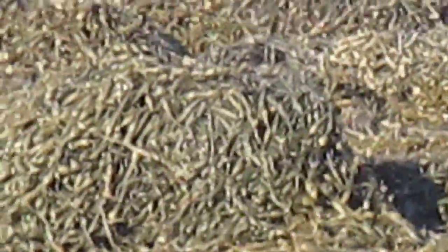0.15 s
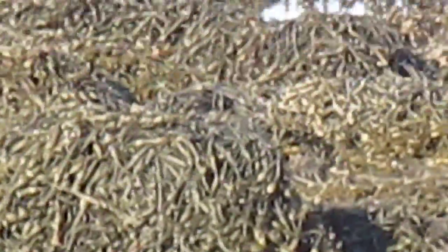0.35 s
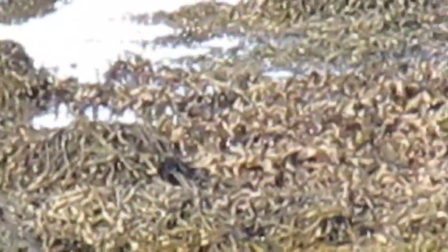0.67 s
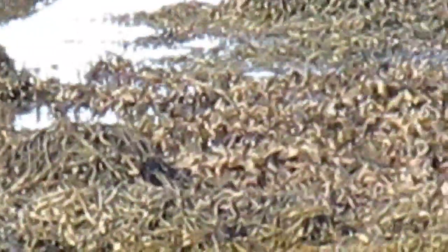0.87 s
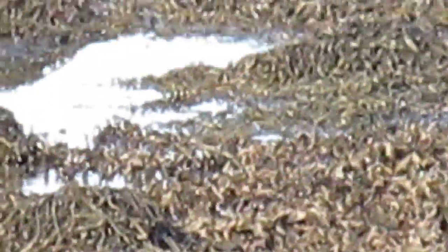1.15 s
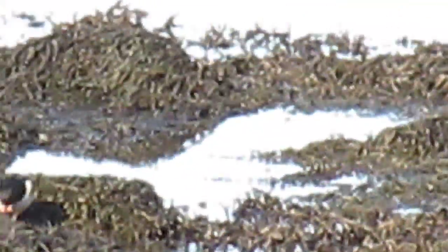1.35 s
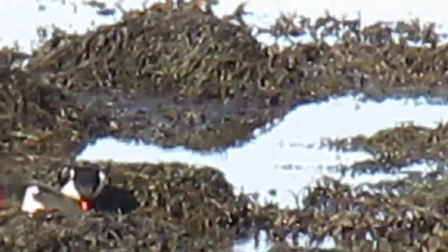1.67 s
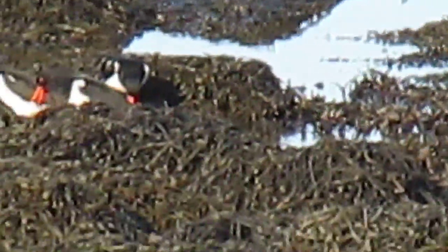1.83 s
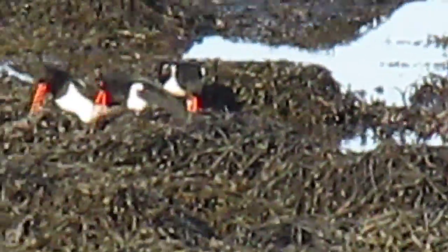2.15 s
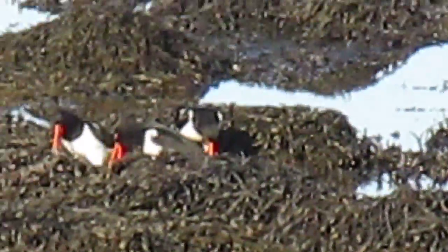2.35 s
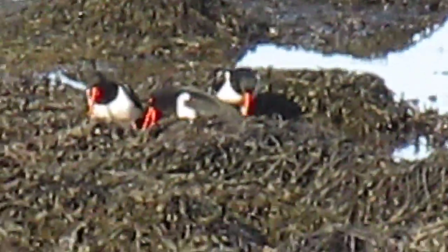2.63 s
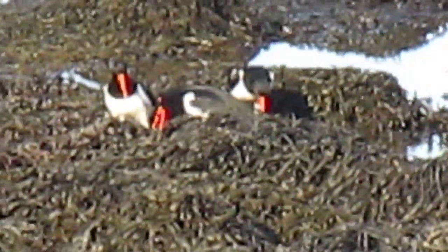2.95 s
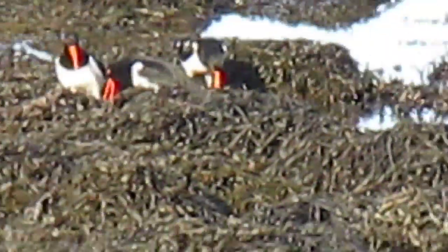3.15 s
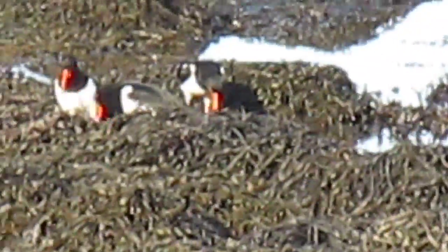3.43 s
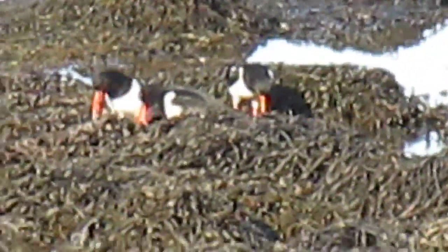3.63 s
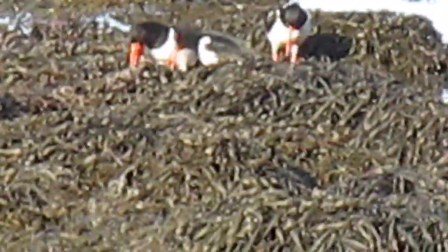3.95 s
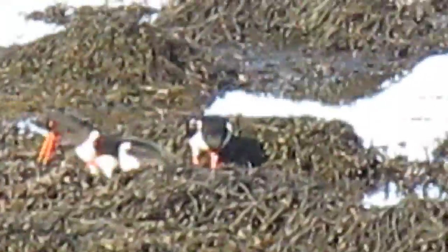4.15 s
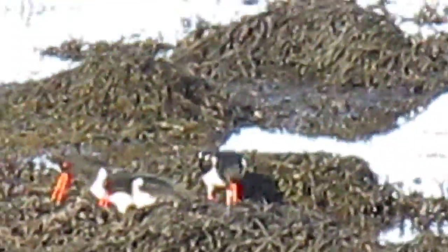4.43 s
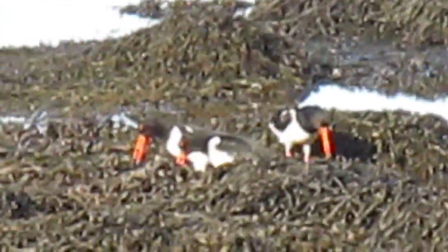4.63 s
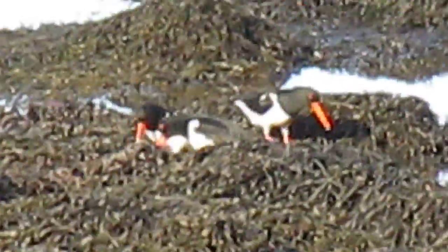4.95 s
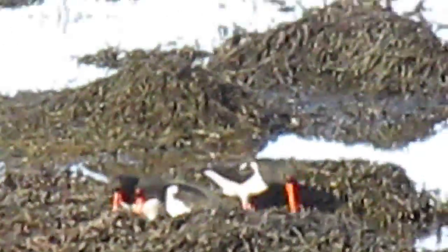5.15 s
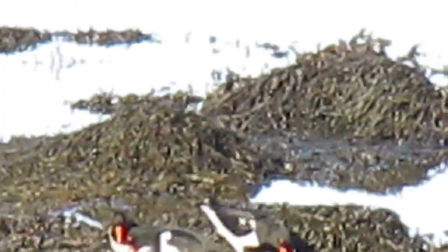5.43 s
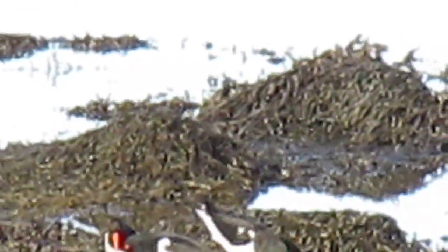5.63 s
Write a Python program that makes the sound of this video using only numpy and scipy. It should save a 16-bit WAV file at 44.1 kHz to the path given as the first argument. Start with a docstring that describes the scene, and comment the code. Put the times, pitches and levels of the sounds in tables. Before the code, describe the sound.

Shrill, piercing wader calls overlap continuously at a moderate distance, with short dull echoes from rocks. A bright lead bird peeps over raspy pips and a fast run of lower yelping notes, gradually dropping in pitch. Close to the microphone, soft irregular wind rumble swells, especially after four and a half seconds; light plastic ticks and a brief finger brush come near the end.

```python
"""Oystercatchers piping on a low-tide shore

Three oystercatchers pipe together over weed-covered rocks: arched pips, low reedy notes and slurs.
Each call is a gliding stack of harmonics, scattered off the rocks by decaying noise echoes.
Wind on a hand-held camera is gusting low noise; its case clicks as pushes ringing damped sines.
A finger brush is a short hiss, over faint low throbs and a steady bed of air and microphone hiss."""
import sys
import numpy as np
from scipy import signal
from scipy.fft import rfft, irfft, next_fast_len
from scipy.io import wavfile
from scipy.ndimage import uniform_filter1d

SR = 44100
rng = np.random.default_rng(int(sys.argv[2]) if len(sys.argv) > 2 else 0)


def materialize(psi):
    """Save the field psi as 16-bit PCM at rate SR to the path in sys.argv[1].

    A 1-D psi becomes a single channel; in a 2-D psi each row is a channel.
    """
    bounded = np.clip(np.atleast_2d(psi).T, -1, 1)
    quanta = np.round(bounded * 32767).astype(np.int16)
    wavfile.write(sys.argv[1], SR, quanta)


N = 255339
TIME = np.arange(N) / SR   # seconds

# Wind on the ports. Each row: time in seconds, gust level in dB before trims and chance drift.
GUSTS = [(0.0, -42.5), (0.16, -61), (0.5, -39), (0.63, -49.5), (1.24, -66), (1.43, -37.5), (1.71, -46.5),
         (1.76, -31.5), (2.16, -52.5), (2.26, -38.5), (2.32, -56), (4.0, -39), (4.08, -31), (4.14, -41),
         (4.34, -37), (4.37, -51.5), (4.51, -26), (4.84, -28), (5.03, -54.5), (5.14, -36), (5.6, -36),
         (5.63, -25.5), (5.79, -37.5)]
# Colour of the low wind rumble. Each row: frequency in Hz, relative level in dB.
RUMBLE_COLOUR = [(18, -1.5), (35, 10), (65, 10.5), (100, 2.5), (130, -8.5), (220, -52), (1500, -110)]
# Colour of the higher wind flutter. Each row: frequency in Hz, relative level in dB.
FLUTTER_COLOUR = [(70, -12.5), (115, 2), (160, -6.5), (240, -16.5), (350, -29.5), (550, -52), (3000, -110)]
# Single eddies that slap the ports. Each row: time in seconds, level in dB before the slap trim.
BUFFETS = [(0.486, -41), (1.79, -47.5), (2.25, -53.5), (3.669, -34), (4.061, -36.5), (4.638, -27.5),
           (4.866, -31), (5.298, -36), (5.43, -32.5), (5.661, -36.5)]
# Colour of still shore air and microphone hiss. Each row: frequency in Hz, relative level in dB.
AIR_COLOUR = [(30, -5.5), (200, 14), (450, 0.5), (650, -2), (1200, -1), (2500, 1.5), (4500, -9),
              (6300, -11.5), (9500, -9.5), (12000, -14), (15500, -17.5)]
AIR_DB = -55.5
# Overall colour of the calls as heard, throat, ground and microphone together, as partials
# glide through it. Each row: frequency in Hz, strength in dB.
CALL_COLOUR = [(1300, -1.5), (2100, -1), (2600, 6.5), (3300, 2.5), (4300, -5), (5100, -8), (5600, -13),
               (6400, -3.5), (6750, -11.5), (7500, -3.5), (7900, -13), (9800, -9.5), (12000, -16.5),
               (15000, -42)]
# Drawn-out slurs. Each row: a contour of (time in seconds, pitch in Hz) points,
# then overtone level in dB before the trim.
SLURS = [([(0, 2090), (.015, 2240), (.04, 2050), (.065, 1396)], -62.5), ([(.255, 1463), (.27, 2204),
         (.32, 2010), (.385, 1572)], -60.5), ([(.435, 1500), (.448, 2250), (.458, 1990), (.469, 2270),
         (.482, 1930)], -62), ([(.488, 1430), (.503, 1997), (.56, 1906), (.6, 1440)], -58.5)]
# Touches on the camera case. Each row: time in seconds, strength of the push in dB.
CLICKS = [(.04, -41.5), (.305, -42), (.685, -38), (.84, -40.5), (1.163, -37), (1.217, -38.5), (1.32, -37),
          (1.908, -34), (4.051, -37.5), (4.206, -28.5), (4.356, -27.5), (4.409, -24.5), (5.388, -34),
          (5.425, -29.5), (5.435, -30.5), (5.565, -35.5)]
# A push of the reference strength has this corner frequency; weaker pushes sit lower.
CLICK_REFERENCE_DB, CLICK_REFERENCE_HZ = -27.5, 4900
# Ringing modes of the case. Each row: frequency in Hz, level in dB, 60 dB decay time in seconds.
CASE_MODES = [(740, -39, 0.0055), (1020, -6, 0.038), (1350, 15.5, 0.0028), (2080, 1.5, 0.008),
              (2710, 3, 0.021), (3150, -1, 0.028), (3510, 0.5, 0.02), (3900, 5, 0.0063),
              (5830, 0.5, 0.0091), (6830, 1, 0.0095)]
# The lead bird's full peeps. Each row: crest time in seconds, nominal length in seconds,
# crest pitch in Hz, fundamental level in dB before the trim.
PEEPS = [(0.104, .097, 3250, -41.5), (0.387, 0.075, 3170, -43.5), (0.664, 0.073, 3184, -41.5),
         (.936, 0.055, 3085, -40), (1.013, 0.044, 3224, -36), (1.263, 0.046, 3287, -40.5),
         (1.434, 0.038, 2980, -45.5), (1.527, .047, 3170, -40), (1.778, 0.048, 3107, -37.5),
         (1.988, 0.043, 3095, -35), (2.192, 0.046, 3037, -39), (2.406, 0.047, 3057, -37),
         (2.643, 0.04, 2866, -37.5), (2.883, 0.05, 2923, -41.5), (3.118, 0.055, 2973, -39),
         (3.381, .045, 2713, -37), (3.65, 0.046, 2740, -38), (3.955, 0.043, 2570, -37.5),
         (4.248, 0.05, 2470, -47.5), (4.525, 0.045, 2390, -49), (5.011, 0.042, 2700, -42.5),
         (5.432, 0.052, 2407, -41.5), (5.7, 0.045, 2684, -44.5)]
# Short pips, most leading into a peep. Each row: crest time in seconds, crest pitch in Hz,
# fundamental level in dB before the trim.
KIPS = [(.223, 2888, -43), (0.487, 2870, -43.5), (.762, 3050, -43.5), (1.214, 2825, -45.5),
        (1.701, 2924, -38), (1.935, 2785, -36), (2.106, 2720, -45), (2.139, 2740, -36), (2.37, 2840, -38),
        (2.586, 2753, -38), (2.826, 2677, -40), (3.077, 2840, -48.5), (3.326, 2730, -38.5),
        (3.599, 2755, -38.5), (3.889, 2700, -38.5), (4.161, 2655, -43), (4.435, 2460, -45.5),
        (4.968, 2584, -43.5), (5.257, 2894, -43.5), (5.459, 2730, -42), (5.662, 2680, -50)]
KIP_S = .037   # nominal length
# The lead bird's overtones. Each row: time in seconds, overtone level in dB before the trim.
LEAD_OVERTONES = [(.6, -60.5), (1.05, -49), (1.9, -57.5), (2.6, -58), (2.9, -51.5), (3.1, -55), (4.0, -55),
                  (4.5, -62), (5.15, -52), (5.5, -64.5)]
# Peeps and pips share one arch: climb and bend as shares of the nominal length.
RISE_SHARE, BEND_SHARE = .44, .84
# A second bird's flat, harsh pips. Each row: crest time in seconds, crest pitch in Hz,
# overtone level in dB before the trim.
RASPS = [(0.123, 2515, -64.5), (0.326, 2550, -60.5), (.607, 2530, -57.5), (.785, 2626, -54.5),
         (0.973, 2573, -54.5), (1.129, 2537, -53), (1.301, 2570, -55), (1.451, 2580, -54),
         (1.628, 2525, -55.5), (1.779, 2440, -58.5), (2.687, 2450, -56.5), (2.85, 2487, -53.5),
         (3.054, 2394, -52.5), (3.248, 2440, -52.5), (3.434, 2415, -54.5), (3.61, 2380, -56.5),
         (4.69, 2330, -60.5), (4.776, 2270, -65), (5.203, 2287, -65.5), (5.236, 2490, -58.5),
         (5.642, 2380, -63.5)]
# A run of reedy arches, about seven a second. Each row: crest time in seconds, length in seconds,
# crest pitch in Hz.
YELPS = [(0.727, 0.033, 2520), (0.927, 0.034, 2430), (1.098, 0.031, 2360), (1.244, .028, 2360),
         (1.419, 0.039, 2410), (1.586, 0.038, 2330), (2.077, 0.046, 2294), (2.234, 0.042, 2237),
         (2.385, 0.054, 2240), (2.531, 0.053, 2320), (2.668, .042, 2146), (2.772, 0.03, 1836),
         (2.961, 0.025, 1810), (3.144, 0.034, 1880), (3.23, 0.041, 1996), (3.347, 0.038, 1993),
         (3.467, 0.033, 2050), (3.592, 0.046, 2040), (3.72, 0.047, 2046), (3.852, 0.05, 2084),
         (3.993, 0.039, 2010), (4.138, 0.059, 2034), (4.276, 0.046, 1927), (4.402, 0.031, 1985),
         (4.566, .055, 2080), (4.72, 0.053, 1976), (4.847, 0.027, 2280), (4.872, 0.036, 1764),
         (5.112, 0.031, 2100), (5.133, 0.04, 1847), (5.29, 0.038, 1925), (5.402, 0.029, 2290),
         (5.566, 0.02, 2020), (5.751, 0.06, 1924)]
# Effort through that run. Each row: time in seconds, overtone level in dB.
YELP_EFFORT = [(.9, -60.5), (2.1, -66.5), (2.9, -64), (3.4, -66), (5.5, -70)]
# Low notes that scoop up and hold. Each row: start in seconds, held pitch in Hz.
CLUCKS = [(0.748, 1820), (0.948, 1660), (1.029, 1700), (1.196, 1910), (1.412, 1897), (1.568, 1770),
          (1.713, 1780), (1.866, 1800), (2.033, 1783), (2.184, 1746), (2.337, 1755), (2.481, 1662),
          (2.627, 1714), (2.81, 1555), (3.009, 1586), (3.206, 1567), (3.393, 1540), (3.565, 1555),
          (4.362, 1574), (4.513, 1560), (4.635, 1523), (4.755, 1455), (4.976, 1750), (5.592, 1520)]
CLUCK_S = .032   # length between the soft edges
# Effort through the low notes. Each row: time in seconds, overtone level in dB.
CLUCK_EFFORT = [(.7, -61), (2.6, -61), (4.4, -78), (5.6, -67.5)]
# A faint low hum in short throbs. Each row: time in seconds, level in dB.
THROBS = [(1.97, -60), (2.13, -61.5), (2.21, -64), (2.36, -63), (2.445, -57.5), (2.53, -60), (2.6, -57.5),
          (2.78, -61)]
HUM_HZ, HUM_WIDTH_HZ = 450, 71
# A finger brushing the case. Each row: time in seconds, level in dB.
BRUSH_LEVEL = [(5.38, -87), (5.386, -68), (5.395, -42), (5.41, -76), (5.424, -46), (5.44, -59),
               (5.555, -78), (5.567, -55), (5.622, -47.5), (5.632, -99)]
# Colour of the brushing. Each row: frequency in Hz, relative level in dB.
BRUSH_COLOUR = [(800, -3.5), (3000, -1.5), (7500, -2.5), (11000, -2), (15000, -15)]
# Bird balance at the two ports. Each row: frequency in Hz, left minus right level in dB.
BIRD_BALANCE = [(1500, -4), (2200, -4), (3000, -9.5), (4200, -4.5), (5000, -1.5), (6200, 5), (6700, -5),
                (7400, 15), (7850, 3), (8200, 3), (9000, 0.5)]
# Bird phase at the two ports. Each row: frequency in Hz, lead of the left in radians.
BIRD_PHASE = [(1500, 0.32), (2700, -0.39), (3200, -0.058), (5000, 1.28), (7300, 0.84), (7700, -0.83),
              (9500, -0.11), (15000, 0.64)]
CUTOFF_HZ = 15900   # top of the band


def from_db(db):
    """Decibels to gain."""
    return 10 ** (np.asarray(db) / 20)


def at_hz(points, hz):
    """Read a spectrum on a log-frequency axis."""
    f, value = np.transpose(points)
    return np.interp(np.log(hz + 1e-9), np.log(f), value)


def at_time(points, s):
    """Read a curve over time at the moment or moments s."""
    return np.interp(s, *np.transpose(points))


def filtered(x, response):
    """Pass x through a response given as a function of frequency."""
    size = next_fast_len(N + SR // 2)
    hz = np.arange(size // 2 + 1) * SR / size
    return irfft(rfft(x, size) * response(hz), size)[..., :N]


def panned(right_db):
    """Left and right gains of constant power."""
    half_db = .5 * np.atleast_1d(right_db)
    gains = from_db(np.array([-half_db, half_db]))
    return gains / np.sqrt(np.mean(gains ** 2, axis=0))


def noise(spectrum, alike):
    """Coloured stereo noise of rms 1; alike is the correlation of the two sides."""
    white = rng.standard_normal((2, N))
    mid, side = filtered(white, lambda hz: from_db(at_hz(spectrum, hz)))
    both = np.sqrt(1 + alike) * mid + np.sqrt(1 - alike) * side * [[1], [-1]]
    return both / both.std()


def drift(width_hz):
    """Slow random wander of spread 1."""
    slow = filtered(rng.standard_normal(N), lambda hz: np.exp(-(hz / width_hz) ** 2))
    return slow / slow.std()


def add(out, start_s, sound):
    """Mix a sound in at its time, trimmed to the scene."""
    first = round(start_s * SR)
    sound = sound[max(-first, 0):N - first]
    first = max(first, 0)
    out[first:first + len(sound)] += sound


def wind(rumble_db=5.0, flutter_db=-3.0, right_db=6.0, eddy_s=0.0366, growth=0.3,
         gustiness_db=5.0, buffet_s=0.017, buffet_db=8.5):
    """Gusting low wind noise, largely opposite in phase on the two sides; strong gusts add a higher flutter."""
    def eddies(spectrum):
        """Coloured noise evened out over one eddy, so the gusts alone set its level."""
        lumps = noise(spectrum, alike=-0.72)
        power = uniform_filter1d(np.mean(lumps ** 2, axis=0), int(eddy_s * SR))
        return lumps / np.sqrt(power)

    gust = at_time(GUSTS, TIME) + gustiness_db * drift(width_hz=22.0)
    # flutter rises faster than the gust itself
    flutter = from_db(gust + flutter_db + growth * (gust - gust.max()))
    slaps = sum(from_db(db + buffet_db) * np.exp(-((TIME - s) / buffet_s) ** 2) for s, db in BUFFETS)
    rumble = from_db(gust + rumble_db) * eddies(RUMBLE_COLOUR)
    return panned(right_db) * (rumble + (flutter + slaps) * eddies(FLUTTER_COLOUR))


def background():
    """Soft air and microphone hiss as steady noise, nearly independent on the two sides."""
    return from_db(AIR_DB) * noise(AIR_COLOUR, alike=0.025)


def note(pitch, fundamental_db, overtone_db, octave_db, attack_s, release_s,
         jitter=0.0082, shimmer_db=3.0, waver_s=0.002814, blare=0.31):
    """One note of the syrinx: a slightly unsteady harmonic tone, coloured as it glides."""
    t = np.arange(len(pitch)) / SR
    knots = rng.standard_normal((2, 99))
    pitch_waver, level_waver = [np.interp(t / waver_s, np.arange(99), row) for row in knots]
    order = np.arange(1, 9)[:, None]
    hz = order * pitch * (1 + jitter * pitch_waver)
    colour = at_hz(CALL_COLOUR, hz)
    # set the fundamental by itself and the overtones by the average of partials 2 to 4
    lift = np.where(order == 1, fundamental_db - colour[0].mean(), overtone_db - colour[1:4].mean())
    lift = lift + octave_db * (order == 2)
    attack = np.sin(np.pi / 2 * np.clip(t / attack_s, 0, 1))
    release = np.sin(np.pi / 2 * np.clip((t[-1] - t) / release_s, 0, 1))
    # higher partials bloom later and fade sooner with the push of air
    swell = (attack * release) ** (1 + blare * (order - 1))
    strength = from_db(colour + lift + shimmer_db * level_waver) * swell
    partials = np.sin(2 * np.pi * np.cumsum(hz, axis=1) / SR)
    return np.sum(strength * partials * (hz < SR / 2), axis=0)


def slurs(level_db=-5.0, fundamental_db=8, octave_db=11):
    """Longer whining notes near the start, their pitch gliding along smoothed contours."""
    out = np.zeros(N)
    for contour, db in SLURS:
        s, hz = np.transpose(contour)
        pitch = np.interp(np.arange(s[0], s[-1], 1 / SR), s, hz)
        pitch = uniform_filter1d(pitch, size=350)
        add(out, s[0], note(pitch, db + fundamental_db, db, octave_db, attack_s=0.0022, release_s=0.013))
    return from_db(level_db) * out


def case_clicks(left_db=-15, softening=1.35, low_hz=620, top_hz=7500):
    """Each click rings the camera case; weak touches are softer and duller."""
    force, t = np.zeros(N), np.arange(SR // 20) / SR
    for s, db in CLICKS:
        corner_hz = CLICK_REFERENCE_HZ * from_db(softening * (db - CLICK_REFERENCE_DB))
        push = np.exp(-2 * np.pi * corner_hz * t)
        add(force, s, from_db(db) * push / push.sum())
    ring = sum(from_db(db - 60 * t / t60) * np.sin(2 * np.pi * hz * t) for hz, db, t60 in CASE_MODES)
    clicks = signal.fftconvolve(force, ring)[:N]
    # the small case radiates little bass, and a fingertip rounds off the top
    band = signal.butter(2, [low_hz, top_hz], "band", fs=SR, output="sos")
    # quieter and inverted on the left
    return signal.sosfilt(band, clicks) * np.array([[-from_db(left_db)], [1]])


def arch(crest_hz, rise_s, fall_s, bend_s):
    """Pitch climbs to a rounded crest and drops again with each push of air."""
    from_crest_s = np.arange(-rise_s, fall_s, 1 / SR)
    return crest_hz * np.exp(-.5 * (from_crest_s / bend_s) ** 2)


def piping(level_db=1.0, octave_db=5.5, lead_s=0.0043, trail_s=0.0084):
    """The lead bird: short pips and full peeps on one arch, stretched to each length."""
    out = np.zeros(N)
    kips = [(crest, KIP_S, hz, db) for crest, hz, db in KIPS]
    for crest, length, hz, db in list(PEEPS) + kips:
        rise = RISE_SHARE * length + lead_s
        fall = (1 - RISE_SHARE) * length + trail_s
        pitch = arch(hz, rise, fall, BEND_SHARE * length)
        overtone_db = at_time(LEAD_OVERTONES, crest)
        add(out, crest - rise, note(pitch, db, overtone_db, octave_db, attack_s=0.014, release_s=0.026))
    return from_db(level_db) * out


def rasps(level_db=4.5, rise_s=.0135, fall_s=0.026, bend_s=.046, fundamental_db=7.0, octave_db=4.0):
    """Flat pips that start near their crest and droop, rich in overtones."""
    out = np.zeros(N)
    for crest, hz, db in RASPS:
        pitch = arch(hz, rise_s, fall_s, bend_s)
        pip = note(pitch, db + fundamental_db, db, octave_db, attack_s=0.0067, release_s=0.022)
        add(out, crest - rise_s, pip)
    return from_db(level_db) * out


def yelps(rise_share=.6, bend_share=.62, fundamental_db=13.0, octave_db=9):
    """Low arches that climb from well below their crest, with a strong octave."""
    out = np.zeros(N)
    for crest, length, hz in YELPS:
        db = at_time(YELP_EFFORT, crest)
        rise = rise_share * length
        pitch = arch(hz, rise, length - rise, bend_share * length)
        yelp = note(pitch, db + fundamental_db, db, octave_db, attack_s=0.0019, release_s=0.0063)
        add(out, crest - rise, yelp)
    return out


def clucks(scoop=.72, flick=1.04, edge_s=0.0034, fundamental_db=10, octave_db=12):
    """Low notes scoop up, hold, sag a little and end on a flick."""
    out = np.zeros(N)
    progress = np.arange(-edge_s, CLUCK_S + edge_s, 1 / SR) / CLUCK_S
    shape = np.interp(progress, [0, .2, .4, .72, 1], [scoop, .94, 1, .97, flick])
    shape = uniform_filter1d(shape, size=200)
    for start, hz in CLUCKS:
        db = at_time(CLUCK_EFFORT, start)
        cluck = note(hz * shape, db + fundamental_db, db, octave_db, attack_s=0.007, release_s=0.0012)
        add(out, start - edge_s, cluck)
    return out


def throbs(between_db=-76, swell_s=0.018):
    """A narrow band of low noise that swells briefly and sinks back."""
    swells = sum(from_db(db) * np.exp(-((TIME - s) / swell_s) ** 2) for s, db in THROBS)
    white = rng.standard_normal(N)
    hum = filtered(white, lambda hz: 1 / (1 + (2 * (hz - HUM_HZ) / HUM_WIDTH_HZ) ** 2))
    return (from_db(between_db) + swells) * hum / hum.std()


def brush():
    """Skin slides on plastic with a short hiss of shaped noise."""
    return from_db(at_time(BRUSH_LEVEL, TIME)) * noise(BRUSH_COLOUR, alike=0.13)


def shore(x, near_db=-12, near_t60=0.18, far_db=-12, far_t60=0.3, dull_hz=4500, echo_s=0.013, echo_db=-11):
    """Nearby rocks scatter the calls, the wider shore adds a longer tail; both come back dull."""
    t = np.arange(SR // 2) / SR

    def scatter(t60):
        """Decaying noise echoes, partly shared by the two sides."""
        grains = rng.standard_normal((3, len(t))) * from_db(-60 * t / t60) * (t > .002)
        echoes = grains[0] + .5 * grains[1:]
        echoes = echoes / np.sqrt(np.sum(echoes ** 2) / 2)
        return signal.fftconvolve(x[None], echoes, axes=1)[:, :N]

    wet = from_db(near_db) * scatter(near_t60) + from_db(far_db) * scatter(far_t60)
    # one clear echo off a boulder beats against each gliding note
    wet = wet + from_db(echo_db) * np.interp(TIME - echo_s, TIME, x, left=0)
    return x + filtered(wet, lambda hz: 1 / np.hypot(1, (hz / dull_hz) ** 2))


def ports(x):
    """Level and phase at the two microphone ports for sound from ahead."""
    def response(hz):
        turn = np.exp(.5j * at_hz(BIRD_PHASE, hz) * [[1], [-1]])
        return panned(-at_hz(BIRD_BALANCE, hz)) * turn

    return filtered(x, response)


def scene():
    """Birds out on the rocks; wind and handling right at the camera."""
    birds = slurs() + piping() + rasps() + yelps() + clucks()
    return wind() + background() + ports(shore(birds)) + case_clicks() + throbs() + brush()


def record(dry):
    """A steep low-pass cuts the top of the band."""
    return signal.sosfilt(signal.ellip(10, .2, 80, CUTOFF_HZ, fs=SR, output="sos"), dry)


dry = scene()
out = record(dry)
materialize(out)
```